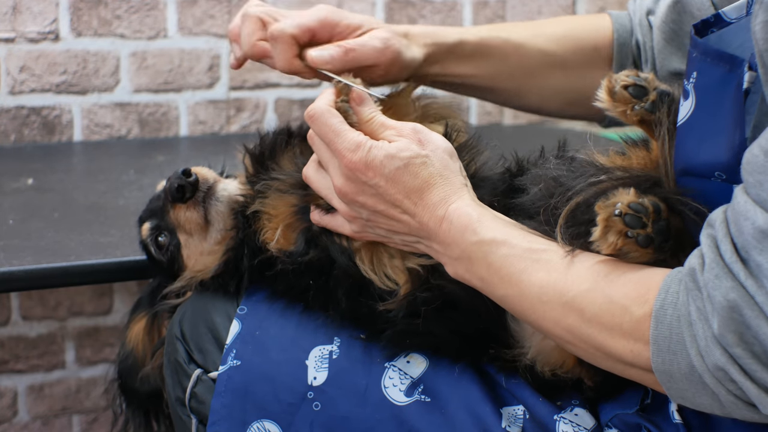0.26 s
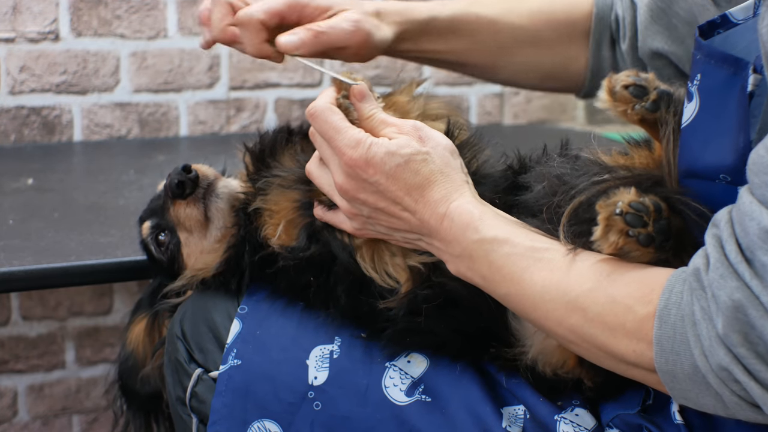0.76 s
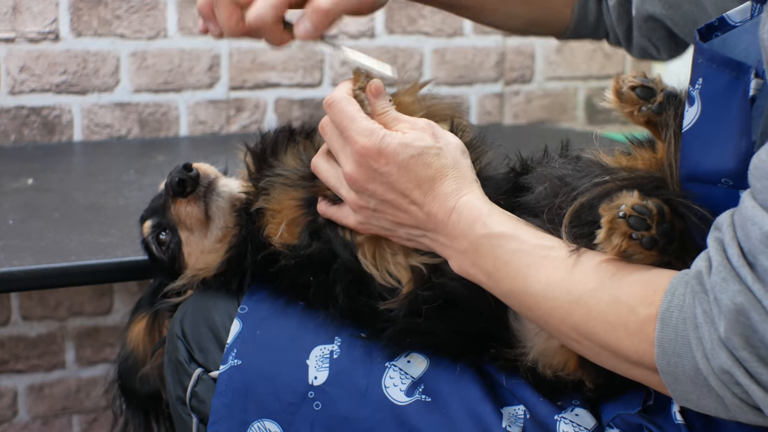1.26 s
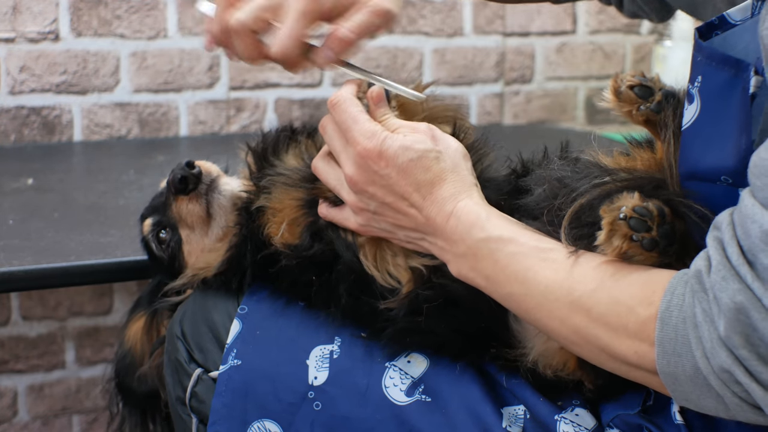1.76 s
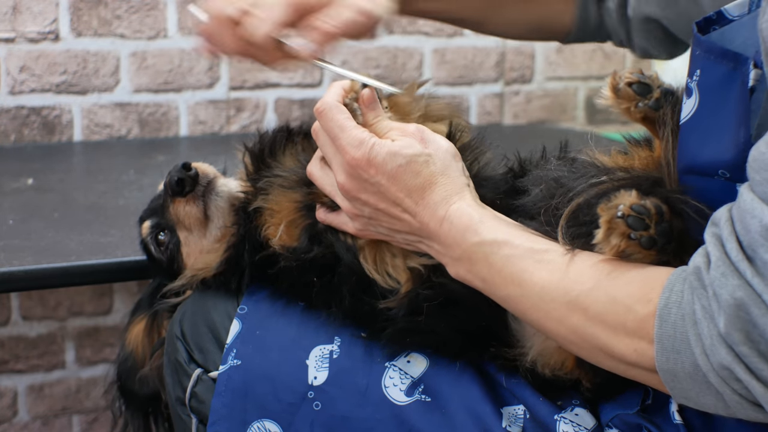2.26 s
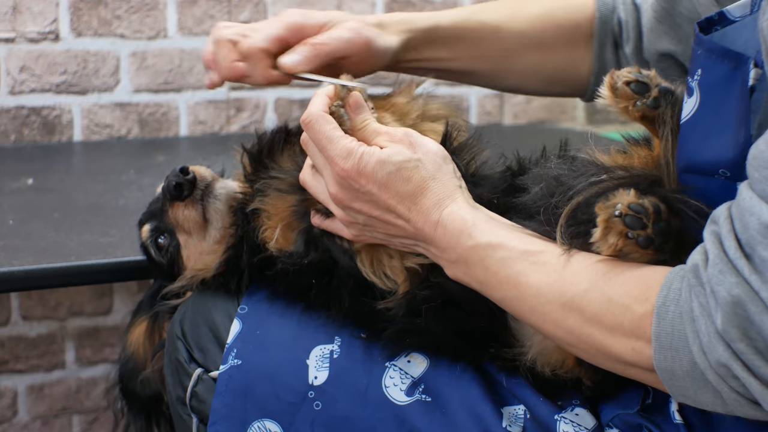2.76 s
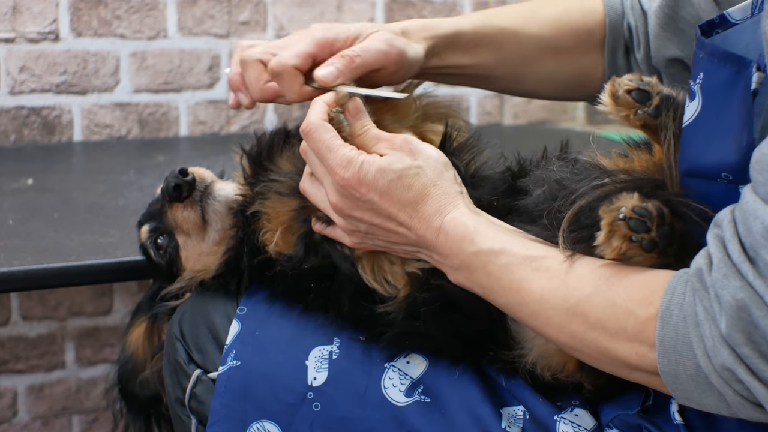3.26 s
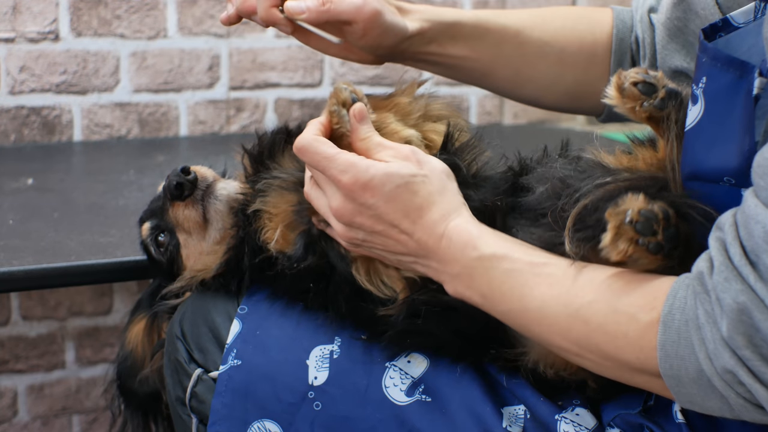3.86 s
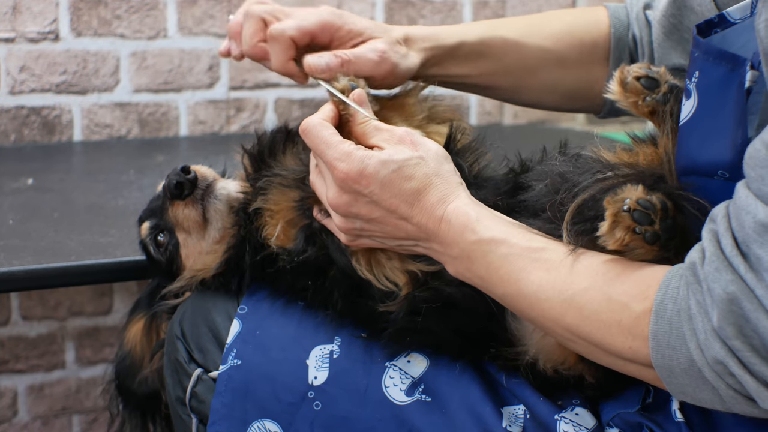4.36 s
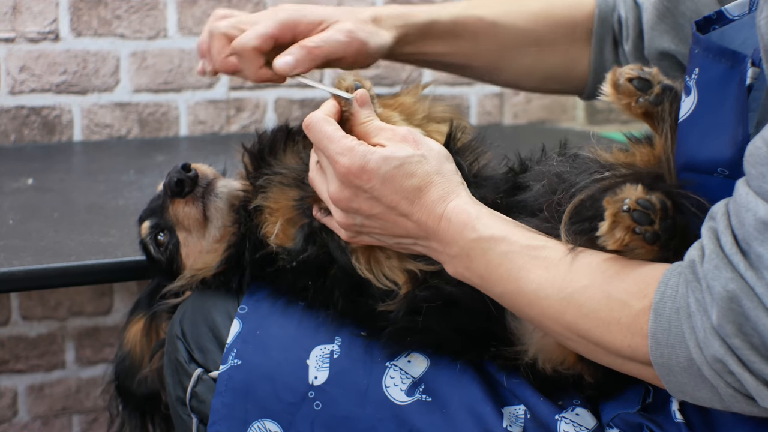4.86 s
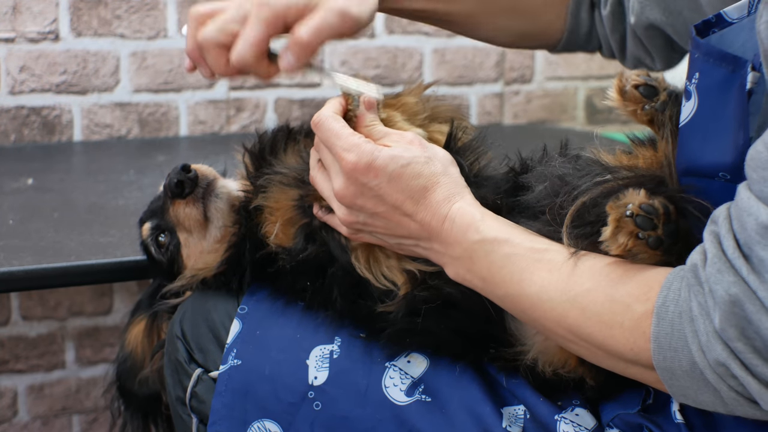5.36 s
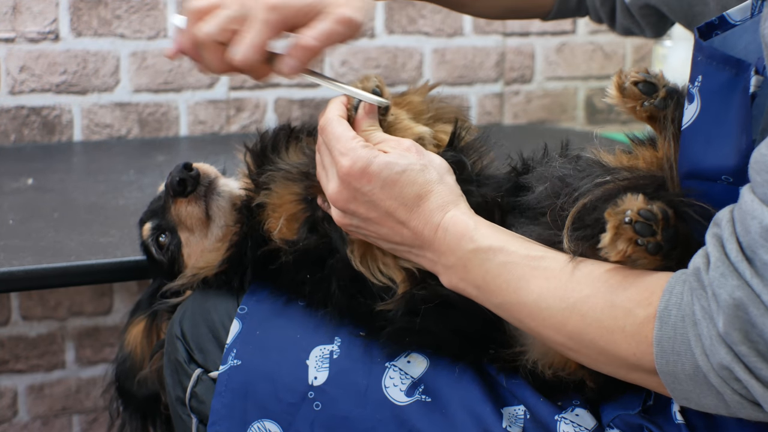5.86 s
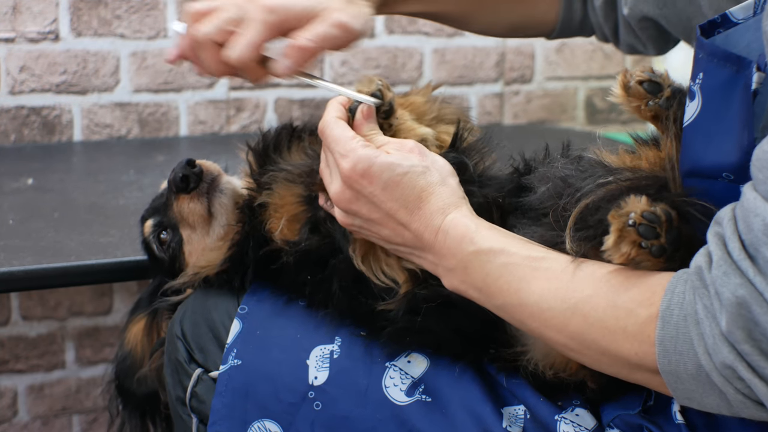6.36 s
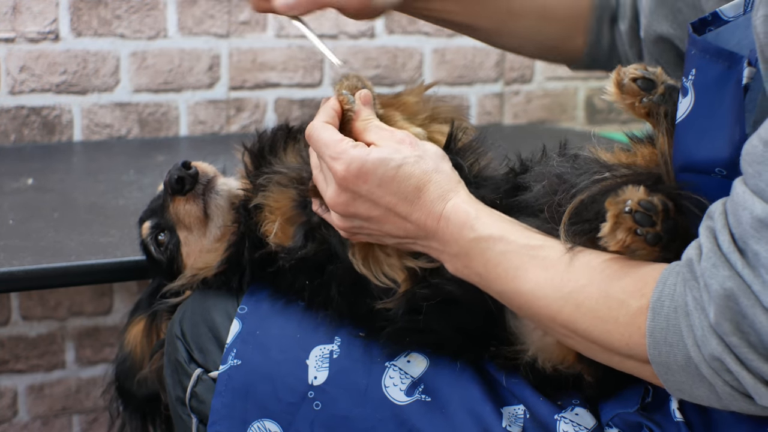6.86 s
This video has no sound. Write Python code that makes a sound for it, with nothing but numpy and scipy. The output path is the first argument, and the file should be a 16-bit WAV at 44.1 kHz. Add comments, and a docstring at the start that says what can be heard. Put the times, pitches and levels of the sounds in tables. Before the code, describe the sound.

A metal nail file rasps quickly across a small dog's claws in short runs with brief pauses, over a low indoor hum.

```python
"""A metal nail file rasps to and fro over a small dog's claws, about ten strokes a second, in short runs.
Its grit chips the claw in tiny fractures: the claw rasps, the paw thuds softly, and the steel blade
rings near 6 kHz under a bright fizz. Now and then the file taps a claw, and fingers rustle in the fur.
A machine hums low under steady hiss in the small room."""
import sys
import numpy as np
from scipy import signal
from scipy.fft import rfft, irfft, next_fast_len
from scipy.io import wavfile
from scipy.ndimage import map_coordinates

SR = 44100
rng = np.random.default_rng(int(sys.argv[2]) if len(sys.argv) > 2 else 0)


def unload_audio(sound):
    """Save the sound as a 16-bit wav file, at the path given as the first command line argument."""
    columns = np.transpose(np.atleast_2d(sound))
    # keep every value between -1 and 1, then stretch to whole-number steps
    steps = np.round(np.clip(columns, -1, 1) * 32767)
    wavfile.write(sys.argv[1], SR, steps.astype(np.int16))


N = 313110


def amp(db):
    """Decibels to gain."""
    return 10 ** (np.asarray(db) / 20)


def unit(x):
    """Scale to rms 1."""
    return x / np.sqrt(np.mean(x ** 2) + 1e-20)


def along(points, hz):
    """Read a curve of (Hz, value) points on a log frequency axis."""
    freqs, values = np.transpose(points)
    return np.interp(np.log(hz + 1), np.log(freqs), values)


def wobble(rate):
    """A smooth random curve, rate knots a second."""
    knots = rng.standard_normal(int(N * rate / SR) + 4)
    return map_coordinates(knots, [np.arange(N) * rate / SR])


def filtered(x, response):
    """Equalise x with a gain given as a function of frequency."""
    size = next_fast_len(N + SR // 4)
    return irfft(rfft(x, size) * response(np.fft.rfftfreq(size, 1 / SR)), size)[..., :N]


def body(x, spectrum, peaks=(), size=2048):
    """Ring x through a causal body of unit energy: a broad spectrum with (Hz, width Hz, dB) peaks."""
    hz = np.fft.rfftfreq(size, 1 / SR)
    peaks_db = sum(boost / (1 + (2 * (hz - centre) / width) ** 2) for centre, width, boost in peaks)
    cepstrum = irfft(np.log(amp(along(spectrum, hz) + peaks_db)))
    ring = irfft(np.exp(rfft(2 * cepstrum[:size // 2], size)))  # minimum phase
    return signal.oaconvolve(x, ring[None] / np.linalg.norm(ring), axes=1)[:, :N]


def stereo(pair, likeness):
    """Mix two unrelated signals into left and right of a given likeness, clipped to -1..1."""
    turn = lambda hz: np.arccos(np.clip(along(likeness, hz), -1, 1)) / 2
    mid, side = filtered(pair, lambda hz: np.array([np.cos(turn(hz)), np.sin(turn(hz))]))
    return np.array([mid + side, mid - side])


def grit(per_second, scatter_db):
    """Tiny fractures at random moments and of uneven size, each radiating in two directions."""
    hits = rng.random(N) < per_second / SR
    sizes = amp(scatter_db * rng.standard_normal(N))
    return unit(hits * sizes * rng.standard_normal((2, N)))


def shifted(modes, detune, scatter_db):
    """The point of contact moves along the blade and favours other modes each time."""
    return [(hz * (1 + detune * rng.standard_normal()), width, boost + scatter_db * rng.standard_normal())
            for hz, width, boost in modes]


def blade(x, modes):
    """The short, high ring of the steel blade."""
    return body(x, [(3000, -50.0), (5600, 4), (6500, 17.5), (7200, -20), (10000, -19.5)], modes)


# Tone of the claw's rasp, the paw's thud and the top fizz. Each row: frequency in Hz, relative level in dB.
RASP_EQ = [(150, -43), (350, -9), (600, -6), (950, -3), (1350, -1), (2000, -2.5), (2700, -3), (3200, -5),
           (4000, -2.5), (4500, -4.5), (5500, -5), (6500, -18), (7300, -18.5), (10000, -47)]
THUD_EQ = [(100, -29), (190, -8), (300, -2.5), (420, -0.5), (600, -12), (1200, -40), (3000, -80)]
FIZZ_EQ = [(4000, -34), (6800, -6.5), (8200, -0.5), (8800, 0), (9650, 2), (10300, -2), (11200, -4),
           (12500, -9), (15800, -12)]
# Resonances of claw and file together, then of the blade alone.
# Each row: centre in Hz, width in Hz, boost in dB.
CLAW_MODES = [(1400, 220, 4), (2565, 190, 6.5), (2896, 163, 7.5), (3274, 190, 6), (3690, 124, 5),
              (5020, 180, 4)]
BLADE_MODES = [(6080, 520, 10), (6380, 380, 7.5)]
# Each new grip on a claw has its own colour. Each row: start in seconds, claw resonance in Hz,
# edge resonance in Hz, paw thud in dB, blade ring trim in dB, fizz trim in dB.
GRIP_COLOURS = [(-1, 1390, 5750, -10, 0, -1.3), (0.47, 2350, 2050, -18.5, -0.7, -1.7),
                (0.88, 1470, 2050, -18, -0.7, -2.5), (1.35, 1450, 3600, -11, 1.2, -1.3),
                (2.17, 3750, 9200, -12.7, 1.5, 1.5), (2.8, 2500, 9650, -17, 1.3, 0.5),
                (4.2, 1850, 7600, -10, -6.5, 0.8), (5.45, 2400, 9600, -14, 2.5, 0.5)]


def claw_paw_and_blade(scrape, start, ring_db, fizz_db):
    """One stroke's scrape shakes claw, paw and blade, coloured by the grip held at its start."""
    grip = [row for row in GRIP_COLOURS if row[0] <= start][-1]
    _, claw_hz, edge_hz, thud_db, ring_trim_db, fizz_trim_db = grip
    contact = shifted(CLAW_MODES, detune=0.0066, scatter_db=2.4)
    contact += [(claw_hz, 450, 4), (edge_hz, 450, 3.3)]
    steel = shifted(BLADE_MODES, detune=0.012, scatter_db=3.2)
    paw_hz = 310 * (1 + 0.1 * rng.standard_normal())  # the paw yields differently under each stroke
    # the file is fastest, and so brightest, in mid-stroke; the fizz is 6 dB down at the turns
    speed = np.sin(np.linspace(0, np.pi, scrape.shape[1]))
    brightness = amp(6 * (speed - 1))
    rasp = amp(-1.26) * body(scrape, RASP_EQ, contact)
    thud = amp(thud_db) * body(scrape, THUD_EQ, [(paw_hz, 70, 6)])
    ring = amp(ring_db + ring_trim_db) * blade(scrape, steel)
    fizz = amp(fizz_db + fizz_trim_db) * body(scrape * brightness, FIZZ_EQ, contact)
    return rasp + thud + ring + fizz


# Pushes cut and mostly bite at once; pulls are lighter and swell slowly unless they snag.
# Each row: start in seconds, length in seconds, relative level in dB, rise in seconds.
PUSH_STROKES = [(-0.054, 0.085, -45, 0.004), (0.15, 0.12, -40, 0.066), (0.391, 0.088, -39.5, 0.004),
                (0.61, 0.073, -42, 0.0052), (0.805, 0.092, -41, 0.023), (1.019, 0.077, -38.5, 0.004),
                (1.437, 0.046, -47.5, 0.0035), (1.526, 0.1, -42, 0.0035), (1.758, 0.091, -39.5, 0.004),
                (1.96, 0.1, -40.5, 0.034), (2.187, 0.077, -38.5, 0.0044), (2.396, 0.066, -46, 0.01),
                (2.624, 0.038, -41.5, 0.0052), (2.991, 0.082, -39.5, 0.004), (3.197, 0.083, -40, 0.0055),
                (3.399, 0.081, -38.5, 0.0046), (4.346, 0.12, -46, 0.019), (4.568, 0.092, -40.5, 0.0051),
                (4.779, 0.088, -38.5, 0.0052), (4.985, 0.085, -38, 0.0056), (5.207, 0.082, -38.5, 0.0049),
                (5.712, 0.12, -41.5, 0.004), (5.988, 0.065, -42.1, 0.004), (6.183, 0.097, -40.0, 0.004),
                (6.407, 0.104, -38.5, 0.0038)]
PULL_STROKES = [(0.035, 0.11, -42.5, 0.042), (0.269, 0.11, -45, 0.032), (0.492, 0.1, -42.5, 0.034),
                (0.712, 0.092, -44.5, 0.004), (0.919, 0.074, -42, 0.0036), (1.112, 0.116, -48, 0.029),
                (1.629, 0.12, -46.0, 0.023), (1.843, 0.12, -45.5, 0.038), (2.05, 0.14, -46.5, 0.035),
                (2.258, 0.12, -43, 0.047), (2.488, 0.1, -52, 0.037), (2.69, 0.032, -53, 0.015),
                (2.784, 0.036, -52.5, 0.012), (2.876, 0.1, -45.8, 0.029), (3.084, 0.11, -44.6, 0.037),
                (3.282, 0.11, -43, 0.034), (3.494, 0.089, -50, 0.029), (4.456, 0.102, -45, 0.034),
                (4.663, 0.108, -45.5, 0.023), (4.863, 0.12, -46.4, 0.035), (5.078, 0.12, -46, 0.04),
                (5.512, 0.03, -55, 0.01), (5.841, 0.12, -41.9, 0.054), (6.072, 0.094, -43, 0.01),
                (6.28, 0.11, -43.5, 0.022), (6.506, 0.097, -47.5, 0.04)]
BITE_SHARE = 0.66  # share of the pressure still missing as the teeth first touch
FADE_SHARE = 0.45  # share of a stroke over which the pressure lets go


def filing():
    """Each stroke bites, digs in and lets go, its pressure shaping a stream of tiny chips."""
    # the file grips and lets go, so the grains come in clumps
    chips = unit(grit(per_second=12000, scatter_db=2.0) * amp(0.97 * wobble(450) + 0.89 * wobble(70)))
    out = np.zeros((2, N + SR))
    # a push presses hard and damps the blade; a pull lets it ring and fizz more
    directions = [(PUSH_STROKES, 0.0095, -12, -10), (PULL_STROKES, 0.0084, -8.7, -7.5)]
    for strokes, dig_in_s, ring_db, fizz_db in directions:
        for start, length, db, rise in strokes:
            samples = np.arange(int(start * SR), int((start + length) * SR))
            age = samples / SR - start
            pressure = np.clip(age / rise, 0, 1) * np.clip((1 - age / length) / FADE_SHARE, 0, 1)
            pressure *= 1 - BITE_SHARE * np.exp(-age / dig_in_s)
            scrape = amp(db) * pressure * chips[:, samples] * (samples >= 0)
            first = max(0, samples[0])  # a stroke already under way at time zero is heard from there
            stroke = claw_paw_and_blade(scrape, start, ring_db, fizz_db)[:, first - samples[0]:]
            out[:, first:first + stroke.shape[1]] += stroke
    return out[:, :N]


# Tone of the machine's rumble and of the hiss. Each row: frequency in Hz, relative level in dB.
RUMBLE_EQ = [(12, -16), (24, -1.5), (40, .5), (50, 1.5), (60, 0), (69, -4), (84, -3), (98, -3), (116, -9.5),
             (130, -8.5), (142, -11), (160, -16), (260, -40)]
HISS_EQ = [(94, -38), (160, 0.5), (244, -3.5), (426, -4.5), (507, -5.5), (591, -8.5), (851, -9.5),
           (1090, -11.5), (1270, -11), (2550, -14), (2970, -15), (15800, -24.5)]
# The machine's hum and whine. Each row: pitch in Hz, rms level in dB before panning.
HUM_TONES = [(80.7, -55.5), (89, -63.5), (120, -62.5), (1080, -77), (2078, -97), (2478, -78), (2918, -86)]
# Width of the noise bed, narrow only in the bass. Each row: frequency in Hz, left-right likeness.
BED_LIKENESS = [(30, 0.9), (100, 0.75), (200, 0.13), (500, 0.067), (1500, 0.04), (4000, 0.026),
                (12000, 0.038)]


def machine_and_hiss():
    """A machine's rumble, wavering hum and faint whine under steady hiss."""
    def noise(spectrum):
        white = stereo(rng.standard_normal((2, N)), BED_LIKENESS)
        return unit(filtered(white, lambda hz: amp(along(spectrum, hz))))

    t = np.arange(N) / SR
    hum = np.zeros(N)
    for hz, db in HUM_TONES:
        level = np.sqrt(2) * amp(db + 2.6 * wobble(5))
        hum += level * np.sin(2 * np.pi * hz * t + 1.29 * wobble(7))
    machine = amp(-47.5) * noise(RUMBLE_EQ) + hum
    lean_left = amp([[.4], [-.4]])
    return machine * lean_left + amp(-55.0) * noise(HISS_EQ)


def burst(start, t60):
    """A short crunch of contact: noise that dies by 60 dB in t60 seconds."""
    out = np.zeros((2, N + SR))
    t = np.arange(SR // 20) / SR
    first = int(start * SR)
    out[:, first:first + len(t)] = rng.standard_normal((2, len(t))) * amp(-60 * t / t60)
    return out[:, :N]


# The file knocks or catches on a claw.
# Each row: start in seconds, relative level in dB, blade ring against the knock in dB.
FILE_TAPS = [(0.4, -58, -20), (1.44, -51.5, 9), (2.346, -35, 5), (2.349, -48, 9), (2.942, -48.5, 8.5),
             (4.373, -44, -23), (4.995, -40, -18), (6.4595, -41, -13), (6.484, -38, -5),
             (6.819, -42.5, -13)]


def taps():
    """The file lands on a claw or slips off its tip: a knock with a steel clink."""
    knock, clink = np.zeros((2, 2, N))
    for start, db, ring_db in FILE_TAPS:
        blow = amp(db + 4.0) * burst(start, t60=0.015)
        knock += blow
        clink += amp(ring_db) * blow
    mid_scoop = (1000, 560, -3)  # a tap is thinner than a stroke
    claw = body(knock, RASP_EQ, CLAW_MODES + [mid_scoop])
    return claw + blade(clink, BLADE_MODES) + amp(-8.0) * body(knock, FIZZ_EQ)


# Small dry ticks as the paw is handled. Each row: start in seconds, relative level in dB, pitch in Hz.
PAW_TICKS = [(3.779, -45.5, 2000), (4.131, -53, 2900), (5.310, -48, 1950), (6.552, -49, 2000)]
# Fingers brush the fur, swelling and fading. Each row: start in seconds, length in seconds, level in dB.
FUR_BRUSHES = [(3.9, 0.37, -63), (5.17, 0.2, -55), (6.5, 0.58, -62), (6.8, 0.28, -56.5), (6.978, 0.17, -51)]
# Tone of the rustle. Each row: frequency in Hz, relative level in dB.
FUR_EQ = [(100, 2.5), (300, 2), (1000, -3.5), (2500, -2), (4000, -3), (6300, -6.5), (8000, -9.5),
          (15000, -24)]
FUR_FLOOR_DB = -68  # fur stirring under the holding hand


def handling():
    """Fingers shift on the paw: a faint rustle of fur and a few dry ticks."""
    t = np.arange(N) / SR
    brushing = sum(amp(db) * np.sin(np.pi * np.clip((t - start) / length, 0, 1))
                   for start, length, db in FUR_BRUSHES)
    level = np.hypot(amp(FUR_FLOOR_DB), brushing) * amp(0.62 * wobble(40))
    out = level * body(grit(per_second=5000, scatter_db=2), FUR_EQ)
    tick_eq = [(200, 1), (2000, 1), (6000, -18)]
    for start, db, hz in PAW_TICKS:
        out += amp(db + 7) * body(burst(start, t60=0.011), tick_eq, [(hz, 900, 10)])
    return out


# Width of the file and paw. Each row: frequency in Hz, left-right likeness.
CLOSE_LIKENESS = [(250, 0.5), (900, 0.65), (1400, 0.7), (2000, 1.5), (2700, 0.27), (3000, -0.01), (3600, 1),
                  (4700, -0.21), (6200, 0.5), (7500, -0.48), (12000, 0.33)]
# Their pan. Each row: frequency in Hz, left minus right in dB.
CLOSE_PAN = [(400, -2), (700, 4), (1450, 0), (1750, 13.5), (1900, -11.5), (2150, 15.5), (2650, -2.5),
             (2900, -1.5), (3250, 0.5), (3750, -2.5), (5100, 1), (6500, -2.5), (8000, -2.5), (9600, 3.5),
             (12000, 1)]
# Their phase offset. Each row: frequency in Hz, lead of the left side in radians.
CLOSE_LEAD = [(300, 0.52), (550, 1.5), (800, -0.16), (1700, 0.07), (2500, -1.56), (3100, -3.5),
              (3500, -5.5), (6500, -7), (9000, -8), (12000, -10)]


def place_close(pair):
    """Spread the close sounds in stereo, each frequency with its own width, pan and phase."""
    half = np.array([[.5], [-.5]])
    pan = lambda hz: amp(half * along(CLOSE_PAN, hz))
    lead = lambda hz: np.exp(1j * half * along(CLOSE_LEAD, hz))
    return filtered(stereo(pair, CLOSE_LIKENESS), lambda hz: pan(hz) * lead(hz))


# The small room's decay. Each row: frequency in Hz, time to fall 60 dB in seconds.
ROOM_DECAY = [(200, 0.12), (2000, 0.27), (12000, 0.39)]


def room(x):
    """The walls' short answer, 5 ms late and lingering longest in the treble."""
    hz, t, noise = signal.stft(rng.standard_normal((2, SR // 3)), SR, nperseg=256)
    decay = amp(-60 * t / along(ROOM_DECAY, hz)[:, None])
    tail = signal.istft(noise * decay, SR, nperseg=256)[1]
    response = np.pad(tail, ((0, 0), (SR // 200, 0))) / np.linalg.norm(tail[0])
    return signal.fftconvolve(x, response, axes=1)[:, :N]


def scene():
    """File and paw close by, in a small humming room."""
    close = place_close(filing() + taps() + handling())
    return close + amp(-11.5) * room(close) + machine_and_hiss()


def record(dry):
    """A hard high cut at 15.9 kHz."""
    return filtered(dry, lambda hz: hz < 15900)


dry = scene()
out = record(dry)
unload_audio(out)
```